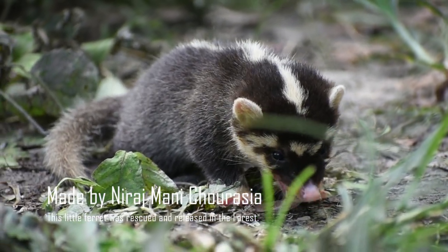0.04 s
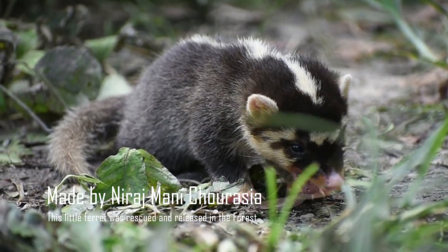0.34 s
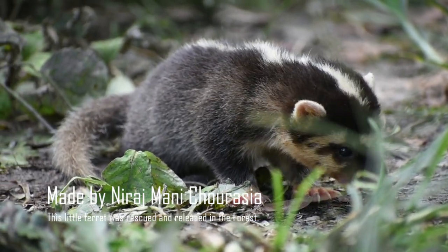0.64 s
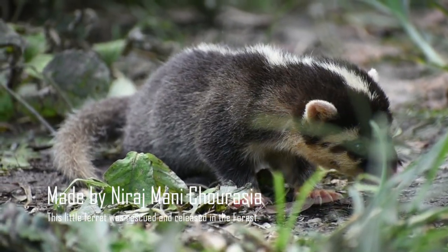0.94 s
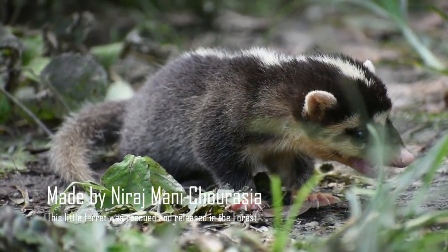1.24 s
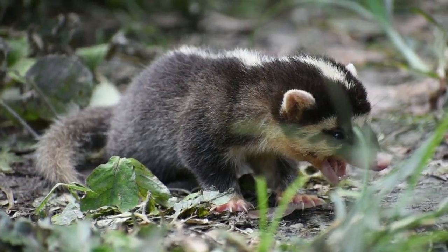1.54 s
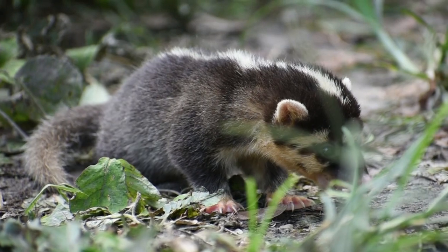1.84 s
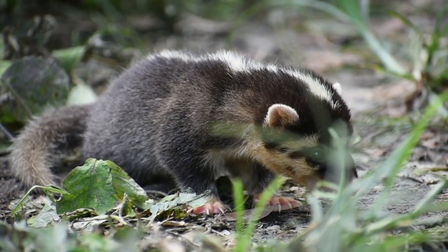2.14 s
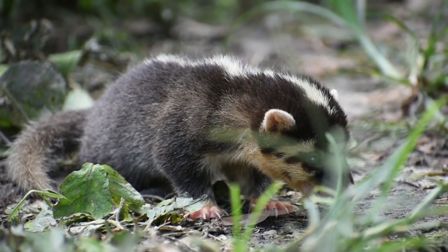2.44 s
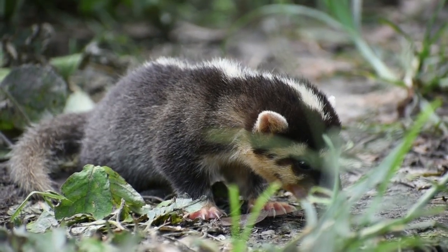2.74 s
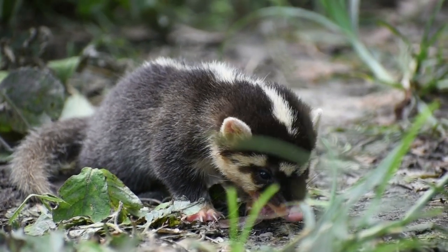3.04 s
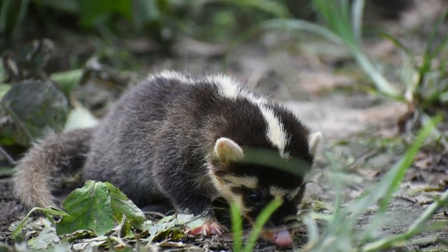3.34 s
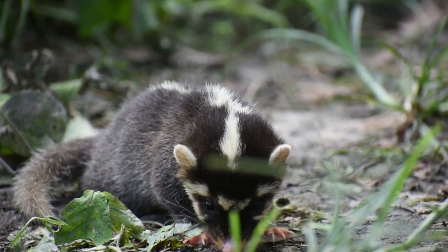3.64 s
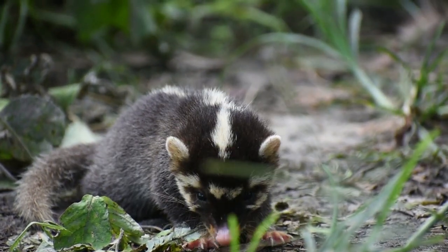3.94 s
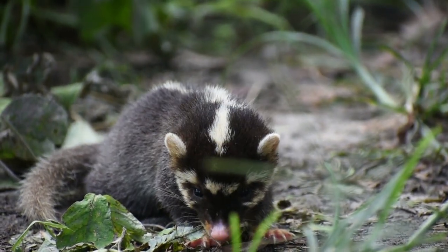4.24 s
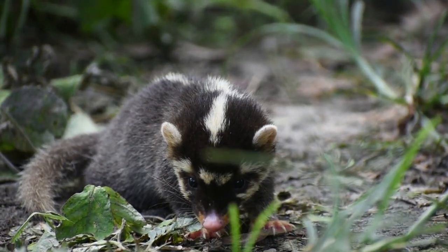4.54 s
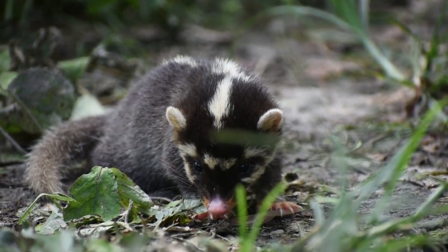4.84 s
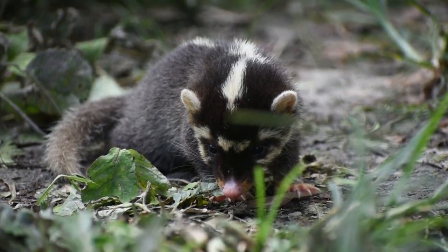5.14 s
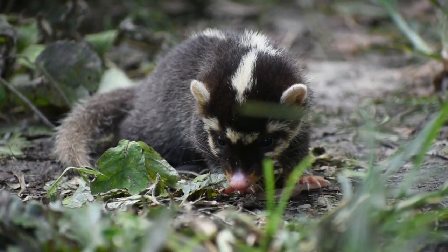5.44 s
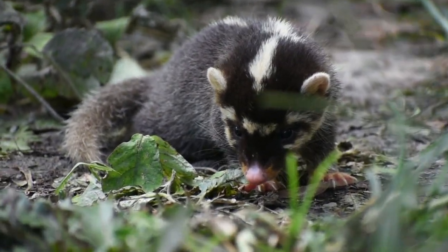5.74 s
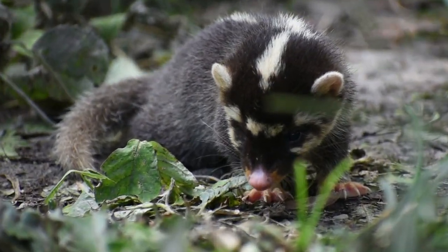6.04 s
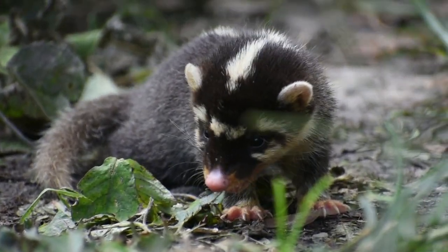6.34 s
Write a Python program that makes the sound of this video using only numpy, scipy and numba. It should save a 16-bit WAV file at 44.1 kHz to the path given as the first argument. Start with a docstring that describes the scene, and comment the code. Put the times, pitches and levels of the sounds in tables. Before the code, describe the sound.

A young ferret-badger gives eight harsh, fluttering churrs with soft growls, clicks and squeaks, over a steady high insect drone.

```python
"""A soft growl swells into a harsh churr: a young ferret-badger, close by on the forest floor, calls eight
times. Each call is a stream of uneven throat pulses that flutters about 55 times a second and rings the
throat and mouth. Hard clicks catch in the voice, and some calls end in a squeak. Behind it insects drone
and tick, faint whistles come between the calls, and the forest air rushes softly."""
import sys
import numpy as np
from scipy import signal
from scipy.fft import rfft, irfft, next_fast_len
from scipy.io import wavfile
from scipy.ndimage import map_coordinates
from numba import njit

SR = 44100
rng = np.random.default_rng(int(sys.argv[2]) if len(sys.argv) > 2 else 0)


def file_out(sig):
    """Save sig as 16-bit WAV at sys.argv[1]."""
    # one column per channel
    cols = np.atleast_2d(sig).T
    # limit, then scale
    lim = np.clip(cols, -1, 1)
    pcm = np.round(lim * 32767).astype(np.int16)
    wavfile.write(sys.argv[1], SR, pcm)


N = 290178

# The calls. A throb is one beat of the flutter. (start [s], length [s], lead-in [s], swell [s],
# churr in mid lead-in [dB], churr peak [dB], growl before fading [dB], extra hiss [dB], closed mouth [Hz],
# open mouth [Hz], half open after [s], time of one throb [s], flutter then [Hz], slowing [Hz/s])
CALLS = [ (0.0, .47, .25, .09, -39, -22, -47.5, 3, 4760, 5170, .07, .333, 50.8, 26),
         (1.22, .52, .365, .035, -39.5, -24.5, -46.5, -6, 3350, 4980, .055, 1.628, 55.0, 42),
         (2.15, .41, .185, .03, -42, -31, -54.5, -15, 4350, 4650, .22, 2.396, 52.2, 34),
         (2.835, .395, .075, .225, -44.5, -27, -50.5, 4, 4100, 5150, .11, 3.085, 55.6, 32),
         (3.825, .485, .245, .095, -41.5, -21.5, -47, 3.5, 3200, 5100, .105, 4.16, 53.0, 24),
         (4.945, .465, .11, .2, -42.5, -26, -53.5, -2, 3250, 4900, .18, 5.236, 53.6, 26),
         (5.64, .275, .045, .12, -40.5, -30.5, -55.5, -1, 4130, 4800, .07, 5.779, 55.6, 18),
         (6.16, .30, .07, .09, -42, -28, -54, -9, 4200, 4920, .07, 6.323, 55.2, 38)]
# Tone colours of the voice, from its low growl to its clicks: (frequency [Hz], gain [dB])
GROWL_COLOUR = [(60, -49), (200, -20), (290, -9.5), (400, -7), (500, -2.5), (590, 0), (680, 0.5),
                (790, -3.5), (980, -5.5), (1500, -39), (4000, -100)]
THROAT_COLOUR = [(60, -51), (200, -14.5), (600, -9), (1000, 2.5), (1300, 7), (1700, 4.5), (2020, 11.5),
                 (2400, 4), (2900, -3.5), (4000, 6.5), (7000, -26)]
CHURR_COLOUR = [(100, -82), (500, -113), (2500, -2.5), (3400, 4.5), (4100, 2), (4500, 0.5), (5200, 4.5),
                (6000, 5), (6800, 7.5), (7900, 6), (9000, -5.5), (12000, -8.5)]
HISS_COLOUR = [(100, -80), (2000, -44.5), (5500, -5), (7000, 10.5), (8200, 11), (9500, 2), (10700, -3.5),
               (12500, -11), (14000, -24), (16000, -34.5)]
CATCH_COLOUR = [(60, -75), (300, -50), (700, -36), (2400, -23), (3500, -17), (4400, -16), (5100, -8.5),
                (6200, -11.5), (8000, -31), (12000, -30), (15000, -55)]
# Hard catches in the voice: (time [s], relative level [dB])
CATCH_TIMES = [(0.2752, 0), (0.3117, -1), (1.41, -8), (1.428, -5.5), (1.6065, -1), (2.1644, -13),
               (2.179, -27), (2.226, -11), (2.357, -9.5), (2.4758, -5), (2.514, -11), (2.843, -14),
               (2.9604, -3.5), (2.9776, -1), (3.0627, -2), (3.843, -17), (4.097, 2), (5.124, -2),
               (5.3505, -18), (5.652, -10)]
# Squeaks: (start [s], length [s], first pitch [Hz], middle pitch [Hz], last pitch [Hz], level [dB])
SQUEAK_NOTES = [(.43, .04, 1150, 1050, 1150, -47), (2.36, .125, 1130, 1170, 1210, -45),
                (2.48, .07, 1180, 1220, 1290, -45), (2.548, .025, 1100, 1060, 900, -50),
                (3.195, .04, 1300, 1350, 1580, -41), (4.288, .022, 1200, 1170, 1100, -47),
                (5.372, .053, 1500, 1380, 1700, -41.5), (5.888, .055, 1520, 1430, 1620, -41),
                (6.40, .05, 1350, 1330, 1500, -46)]
# The tones within a squeak: (multiple of the pitch, relative level [dB])
SQUEAK_HARMONICS = [(1, 1), (2, 3), (3, 7), (4, 9.5), (5, -25)]
# Thin whistles, which sound 3% below these pitches:
# (start [s], length [s], first pitch [Hz], middle pitch [Hz], last pitch [Hz], level [dB])
WHISTLE_NOTES = [(.475, 0.093, 3100, 2730, 2610, -58), (.55, 0.096, 3020, 2740, 2800, -56),
                 (.615, 0.11, 3100, 2990, 2230, -59), (2.57, 0.29, 3080, 2900, 2690, -60.5),
                 (2.67, 0.076, 974, 977, 880, -60.5), (2.82, 0.055, 930, 918, 900, -58.5),
                 (3.35, 0.068, 2630, 2880, 3220, -57.5), (3.40, 0.2, 3560, 3520, 2630, -56),
                 (3.77, 0.066, 944, 937, 880, -60), (5.94, 0.12, 2900, 2750, 2570, -58.5),
                 (6.08, 0.1, 2760, 2940, 3250, -56)]
# How fast the insect chorus sways in pitch: (time [s], sway rate [Hz])
SWAY_RATES = [(0.0, 3.8), (1.0, 3.04), (2.2, 3.14), (2.7, 2.78), (3.2, 3.36), (4.3, 2.84), (5.2, 4.07),
              (6.1, 2.63), (6.58, 4.2)]
# How far it sways each way: (time [s], depth [Hz])
SWAY_DEPTHS = [(0, 109), (1.1, 146.4), (2.1, 279.6), (3.6, 201), (4.5, 133.5), (6.58, 165)]
# Tone colours of the insects, the air and a faint whirr: (frequency [Hz], gain [dB])
CHORUS_COLOUR = [(4300, -38), (5000, -15), (5500, -6.5), (5900, 3), (6250, 5), (6800, 0.5), (7400, 4),
                 (8000, 4), (8500, 3), (9000, -5.5), (9600, -14.5), (10800, -24.5), (12000, -46)]
DRONE_COLOUR = [(6800, -33.5), (7500, -15.5), (7950, 0), (8250, -10), (8900, -38.5)]
TICK_COLOUR = [(10000, -33), (12000, -9.5), (13500, -10), (14600, -2.5), (15200, -5), (15700, -4.5)]
AIR_COLOUR = [(25, -36), (60, -23), (110, -16), (170, -4), (300, 1), (900, 5.5), (1450, 5.5), (1750, 4.5),
              (2150, 6), (2700, 4), (4000, -1), (11000, -2), (16000, -2)]
WHIRR_COLOUR = [(30, -45), (65, -15), (120, -13), (220, -43), (900, -11.5), (1450, 5.5), (1750, 0),
                (2150, 8), (2700, -11.5), (4000, -25)]


def badger_calls():
    """In every call the growl builds, the mouth opens, the churr swells and falls, the flutter slows."""
    out = np.zeros(N + SR)
    for (start, length, lead_s, swell_s, lead_db, peak_db, growl_db, bright_db,
         closed_hz, open_hz, opens_s, throb_s, flutter_hz, slowing) in CALLS:
        age = np.arange(int(length * SR)) / SR
        churr_db, fall = churr_level(age, length, lead_s, swell_s, lead_db, peak_db)
        # the growl builds quickly, then gives way as the throat tightens
        growl_loss_db = 14 * np.exp(-age / .035) + 28 * (age / length) ** 5.5
        opening = .5 + .5 * np.tanh((age - opens_s) / .062)
        mouth_hz = closed_hz + (open_hz - closed_hz) * opening
        dull_db = 3 * (1 - opening) + 25 * fall ** 2  # less hiss from a closed mouth or a fading call
        since_throb = start + age - throb_s
        cycles = flutter_hz * since_throb - .5 * slowing * since_throb ** 2
        throb = np.cos(2 * np.pi * (cycles + .04 * wobble(25, len(age))))
        voice = one_call(churr_db, growl_db - growl_loss_db, mouth_hz, bright_db - dull_db, throb)
        out[int(start * SR):][:len(age)] += voice * signal.windows.tukey(len(age), .08)
    return out[:N]


def churr_level(age, length, lead_s, swell_s, lead_db, peak_db, creep_db_per_s=14, fall_db=23):
    """The churr creeps up, swells, sags and drops. Gives its level and how far it has fallen (0-1)."""
    swell = np.sin(np.pi / 2 * np.clip((age - lead_s) / swell_s, 0, 1))
    fall = np.clip((age - lead_s - swell_s) / max(length - lead_s - swell_s, .01), 0, 1)
    soft_db = lead_db + creep_db_per_s * (np.minimum(age, lead_s) - lead_s / 2)
    onset_db = 12 * np.clip(1 - age / .022, 0, 1) ** 2
    return soft_db + (peak_db - soft_db) * swell - onset_db - fall_db * fall ** 2.7, fall


def one_call(churr_db, growl_db, mouth_hz, bright_db, throb):
    """Fluttering pulses ring the mouth and throat, giving a churr, a hiss, a ring and a growl."""
    n = len(throb)
    progress = np.linspace(0, 1, n)
    # a pressed voice is rough and flutters deeply; a full, relaxed growl runs on steadily
    pressed = np.clip((churr_db - growl_db - 3) / 14, 0, 1)
    force = np.clip((churr_db + 41) / 20, 0, 1)
    full = np.clip((growl_db + 51.5) / 5, 0, 1)
    steady = full * (1 - pressed)
    # the vocal folds beat faster late in the call, with more force and at the top of each throb
    base_hz = 274.8 + 150.1 * progress + 521.3 * force ** 2
    pulse_hz = base_hz * amp((1.17 + 1.22 * pressed) * throb + .5 * wobble(60, n))
    source = throat_pulses(pulse_hz, scatter=.13 + .3 * pressed, spread_db=2.8 + 2.2 * pressed)
    flutter_db = 6.2 * (1 - .7 * steady - .2 * force) + 3 * (2 * progress - 1) ** 2
    gate = np.tanh(2.5 * throb + .5)
    pulses = source * amp(flutter_db * gate + 4 * wobble(46, n))

    mouth = resonate(pulses, mouth_hz * (1 + .0099 * wobble(51.2, n)), width_hz=np.full(n, 650.))
    churr = amp(churr_db) * even(colour(mouth, CHURR_COLOUR))
    hiss = amp(churr_db + bright_db - 9.5) * even(colour(pulses, HISS_COLOUR))

    ring_share = .067 + .4 * progress * pressed + .38 * force ** 2
    ring = ring_share * throat_ring(pulses, growl_db, pressed, throb)
    throat_db = -43.5 + .43 * (churr_db + 32) + .36 * (growl_db + 52)  # follows churr and growl
    lag_db = 27 * steady * np.exp(-(np.arange(n) / SR / .1) ** 2)  # builds late under a steady growl
    throat = amp(throat_db - lag_db) * even(even(colour(pulses, THROAT_COLOUR)) + ring)
    growl = amp(growl_db) * low_growl(source, flutter_db, full, throb)
    return churr + hiss + throat + growl


def throat_pulses(pulse_hz, scatter, spread_db, breath=.25):
    """The vocal folds close unevenly in time and strength, and a puff of rushing air follows each time."""
    n = len(pulse_hz)
    cycles = np.cumsum(pulse_hz) / SR
    beats = np.searchsorted(cycles, np.arange(int(cycles[-1])))
    late, strong = rng.uniform(-1, 1, (len(beats), 2)).T
    closures = (beats + scatter[beats] * late * SR / pulse_hz[beats]).astype(int).clip(0, n - 1)
    pulses = np.zeros(n)
    pulses[closures] = amp(spread_db[beats] * strong)
    puff = signal.lfilter([1], [1, -np.exp(-1 / (.00016 * SR))], pulses)
    source = unit(pulses) + breath * unit(puff * rng.standard_normal(n))
    return signal.sosfilt(signal.butter(2, 110, "high", fs=SR, output="sos"), source)


def throat_ring(pulses, growl_db, pressed, throb, rest_hz=1990, drop_hz=777):
    """The tightening throat rings at two pitches that bend with each throb and sink as the growl fades."""
    tight = pressed * np.clip((-48 - growl_db) / 9.5, 0, 1)
    bend = 1 + .097 * pressed * throb + .039 * pressed * wobble(41.4, len(throb))
    ring_hz = (rest_hz - drop_hz * tight) * bend
    width_hz = 140 + 50 * pressed
    lower = resonate(pulses, ring_hz, width_hz)
    upper = resonate(pulses, 2 * ring_hz, 2 * width_hz)
    return even(lower + 1.4 * pressed * upper)


def low_growl(source, flutter_db, full, throb, rest_hz=525, rise_hz=90):
    """Gently fluttering pulses ring the throat's low note, which rises as the growl grows full."""
    soft = source * amp(.5 * flutter_db * throb)
    note_hz = (rest_hz + rise_hz * full) * (1 + .1 * throb)
    note = resonate(soft, note_hz, width_hz=np.full(len(soft), 140.))
    return even(even(colour(soft, GROWL_COLOUR)) + .8 * even(colour(note, GROWL_COLOUR)))


def catches(gain_db=14.5, fade_db_per_s=1500):
    """The vocal folds snap shut hard, and three weaker snaps tumble after."""
    snaps = np.zeros(N)
    for start, db in CATCH_TIMES:
        gaps_s = .0014 * rng.uniform(.66, 1.3, 4)
        after_s = np.cumsum(gaps_s) - gaps_s[0]
        snaps[((start + after_s) * SR).astype(int)] = amp(db + gain_db - fade_db_per_s * after_s)
    return colour(snaps, CATCH_COLOUR)


def glides(notes, partials, waver, flutter_hz):
    """Squeaks or whistles: short tones that bend through three pitches and tremble as they go."""
    out = np.zeros(N + SR)
    for start, length, first_hz, middle_hz, last_hz, db in notes:
        n = int(length * SR)
        arc = np.polyfit([0, .5, 1], [first_hz, middle_hz, last_hz], 2)
        hz = np.polyval(arc, np.linspace(0, 1, n)) * (1 + waver * wobble(679, n))
        phase = 2 * np.pi * np.cumsum(hz) / SR
        tone = sum(amp(level) * np.sin(multiple * phase) for multiple, level in partials)
        tremble = amp(-4 * np.cos(2 * np.pi * flutter_hz * np.arange(n) / SR) + 2 * wobble(110, n))
        out[int(start * SR):][:n] += amp(db) * unit(tone * tremble) * signal.windows.tukey(n, .4)
    return out[:N]


def undergrowth(voice, fade_s):
    """Ground and leaves scatter a short echo that dies away by 60 dB in fade_s."""
    t = np.arange(SR // 3) / SR
    tail = rng.standard_normal(len(t)) * amp(-60 * t / fade_s) * (t > .001)
    return signal.fftconvolve(voice, tail / np.linalg.norm(tail))[:N]


def insects():
    """A chorus that sways in pitch, a steady drone within it, and one very high insect ticking."""
    t = np.arange(N) / SR
    sway_hz = np.interp(t, *np.transpose(SWAY_RATES))
    depth_hz = np.interp(t, *np.transpose(SWAY_DEPTHS))
    shift_hz = 25 + depth_hz * np.cos(2 * np.pi * np.cumsum(sway_hz) / SR)
    # slide the whole band of noise up and down by shift_hz
    chorus = np.real(signal.hilbert(noise(CHORUS_COLOUR)) * np.exp(2j * np.pi * np.cumsum(shift_hz) / SR))
    drone = amp(-45 + 2.8 * wobble(7, N)) * noise(DRONE_COLOUR)
    chirp_phase = 2 * np.pi * np.cumsum(20.25 + .12 * wobble(3, N)) / SR
    strokes = amp(4.5 * np.cos(4 * chirp_phase) + 3 * np.cos(chirp_phase))  # four wing strokes a chirp
    chorus_db = -38.5 + .72 * wobble(4.2, N)
    ticks = amp(-51.5) * unit(strokes * noise(TICK_COLOUR))
    return amp(chorus_db) * chorus + drone + ticks


def forest_air():
    """A quiet, almost steady rush of air."""
    return amp(-54.5 + .12 * wobble(2.8, N)) * noise(AIR_COLOUR)


def whirr(beat_hz=10):
    """A very faint whirr that pulses evenly."""
    beat = np.cos(2 * np.pi * beat_hz * np.arange(N) / SR + 1.23)
    return amp(-61) * unit(amp(7 * beat) * noise(WHIRR_COLOUR))


def amp(db):
    """Turn decibels into a gain."""
    return 10 ** (np.asarray(db) / 20)


def unit(x):
    """Scale a sound to an average strength (rms) of 1."""
    return x / np.sqrt(np.mean(x ** 2) + 1e-20)


def even(x, size=2400):
    """Hold the strength at 1 over a few throbs, keeping the flutter."""
    window = np.hanning(size)
    power = signal.fftconvolve(x ** 2, window / window.sum(), "same")
    return x / np.sqrt(np.abs(power) + 1e-12)


def wobble(rate, n):
    """A smooth curve, n samples long, through `rate` random values a second."""
    return map_coordinates(rng.standard_normal(int(n * rate / SR) + 4), [np.arange(n) * rate / SR])


def colour(x, points):
    """Shape a sound's lows and highs with a tone colour table."""
    size = 2 * next_fast_len(len(x) // 2 + 4096)
    hz, db = np.transpose(points)
    gain_db = np.interp(np.log(np.fft.rfftfreq(size, 1 / SR) + 1), np.log(hz), db)
    cepstrum = irfft(np.log(amp(gain_db)))
    # fold it so that the filter rings after a pulse, never before
    cepstrum[1:size // 2] *= 2
    cepstrum[size // 2 + 1:] = 0
    return irfft(rfft(x, size) * np.exp(rfft(cepstrum)))[:len(x)]


def noise(points):
    """Noise of strength 1 with the given tone colour."""
    return unit(colour(rng.standard_normal(N), points))


@njit
def resonate(x, hz, width_hz):
    """Make a sound ring at a moving pitch; a wider ring dies away sooner."""
    y, state = np.zeros(len(x)), 0j
    for i in range(len(x)):
        state = state * np.exp(np.pi * (2j * hz[i] - width_hz[i]) / SR) + x[i]
        y[i] = state.real
    return y


def scene():
    """The young animal close by, with whistles, insects and quiet forest air around it."""
    squeaks = glides(SQUEAK_NOTES, SQUEAK_HARMONICS, waver=.024, flutter_hz=50)
    voice = badger_calls() + catches() + squeaks
    echo = amp(-7.5) * undergrowth(voice, fade_s=.085)
    whistles = glides(WHISTLE_NOTES, [(.97, 0)], waver=.04, flutter_hz=27.4)
    return (voice + echo + whistles + insects() + forest_air() + whirr())[None]


def record(dry, top_hz=15750):
    """Cut away the very highest treble."""
    size = next_fast_len(N + SR // 2)
    kept = np.fft.rfftfreq(size, 1 / SR) < top_hz
    return irfft(rfft(dry, size) * kept, size)[:, :N]


dry = scene()
out = record(dry)
file_out(out)
```